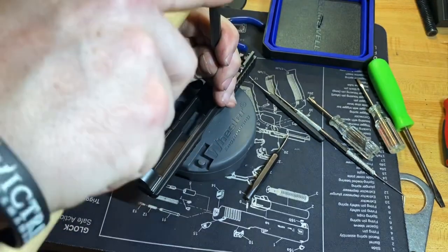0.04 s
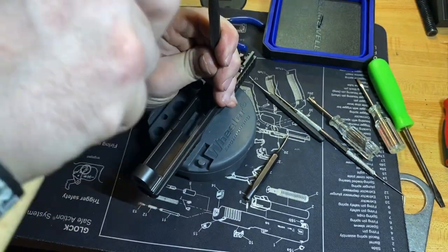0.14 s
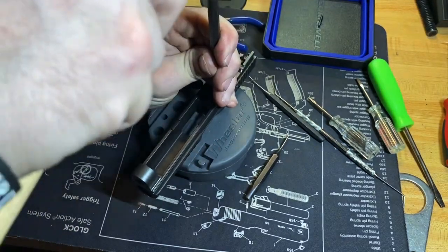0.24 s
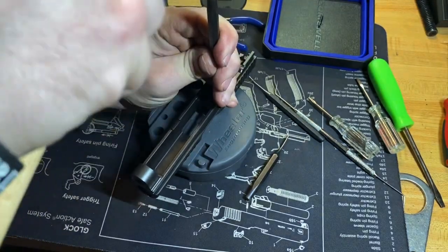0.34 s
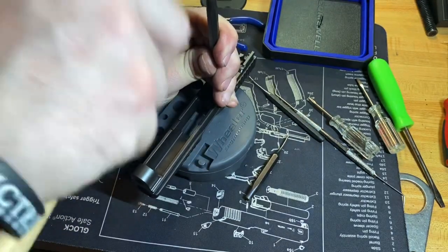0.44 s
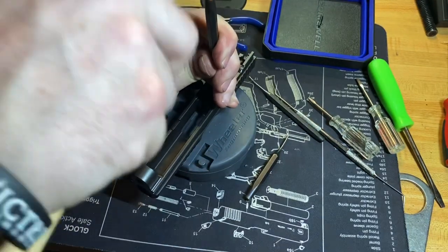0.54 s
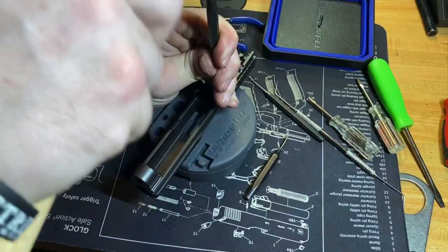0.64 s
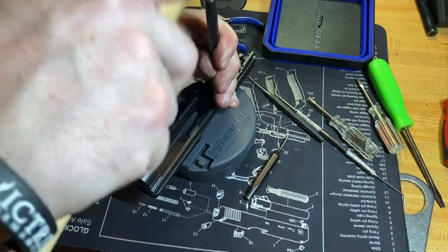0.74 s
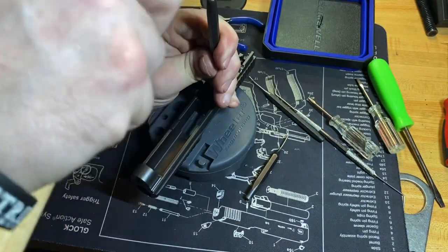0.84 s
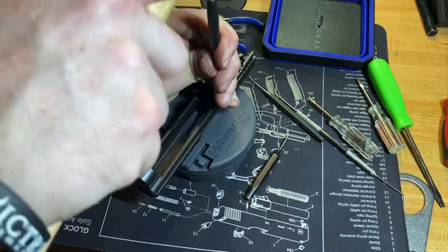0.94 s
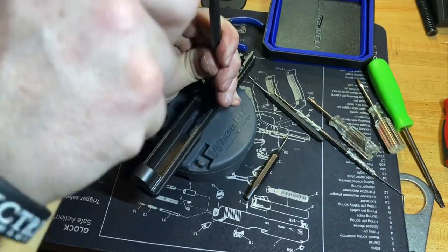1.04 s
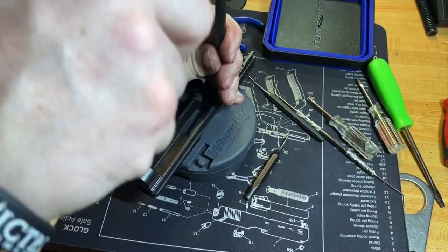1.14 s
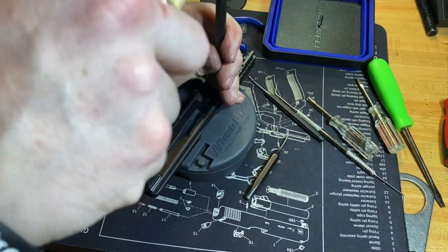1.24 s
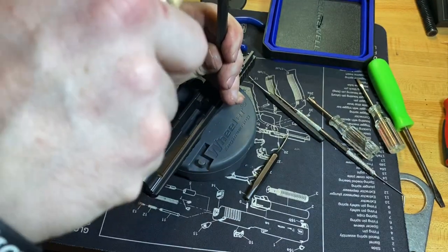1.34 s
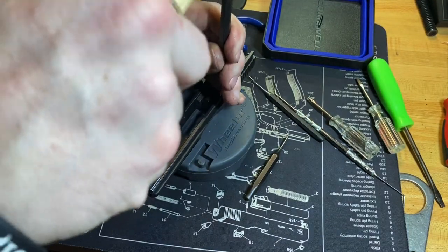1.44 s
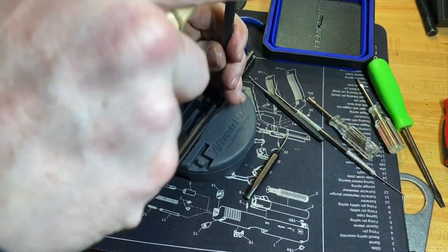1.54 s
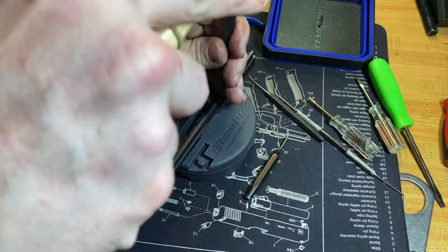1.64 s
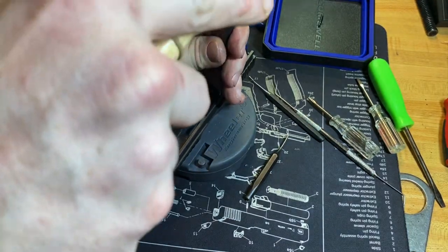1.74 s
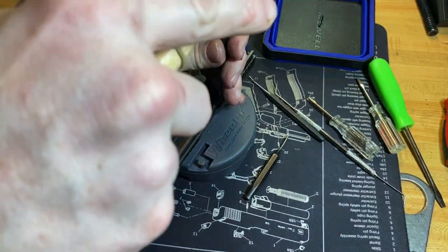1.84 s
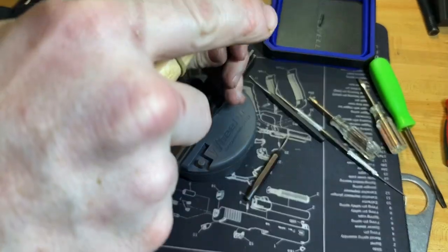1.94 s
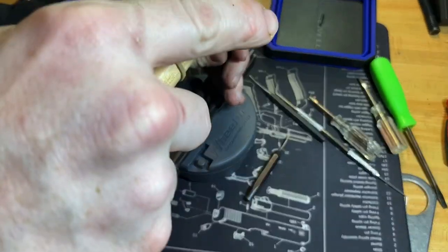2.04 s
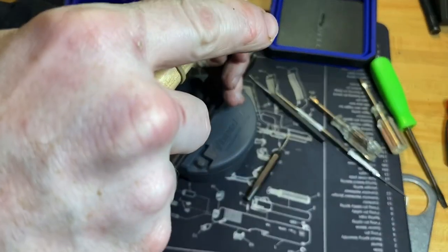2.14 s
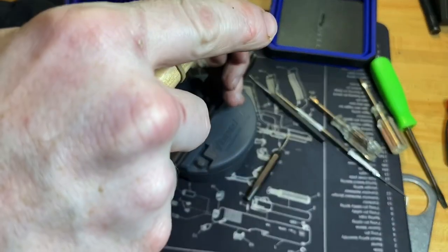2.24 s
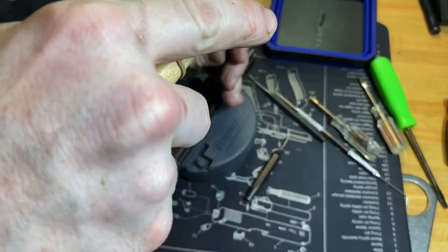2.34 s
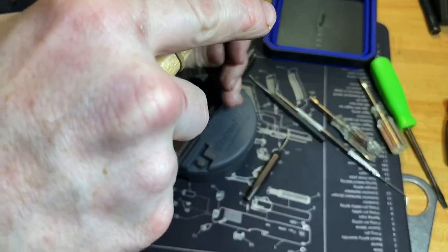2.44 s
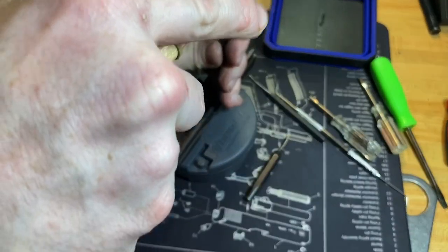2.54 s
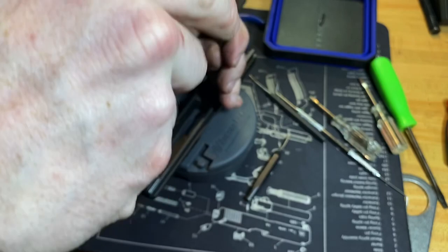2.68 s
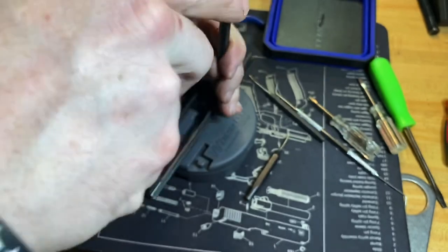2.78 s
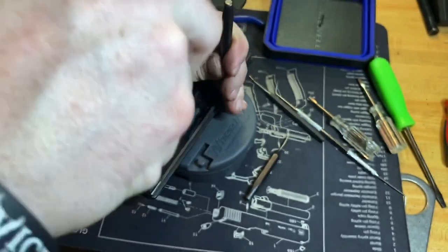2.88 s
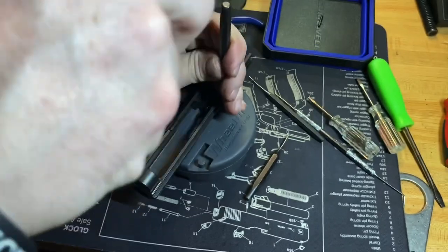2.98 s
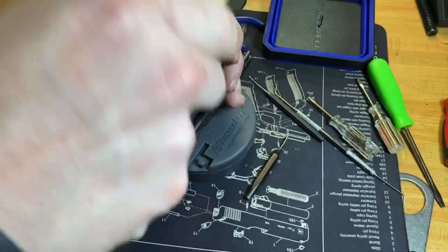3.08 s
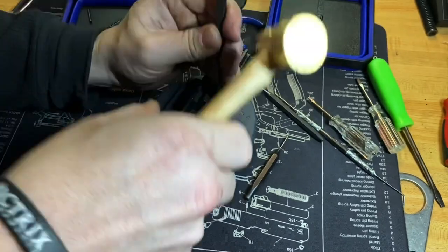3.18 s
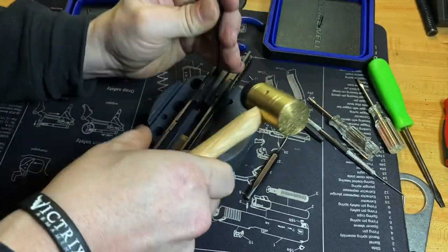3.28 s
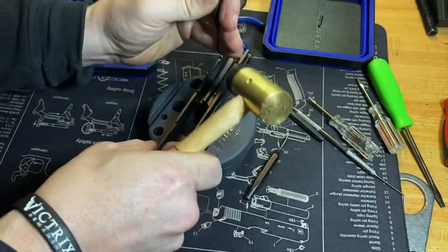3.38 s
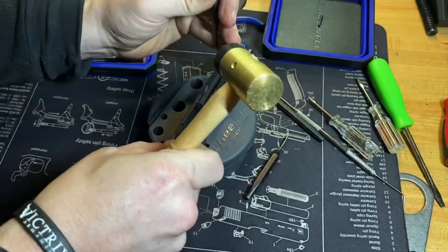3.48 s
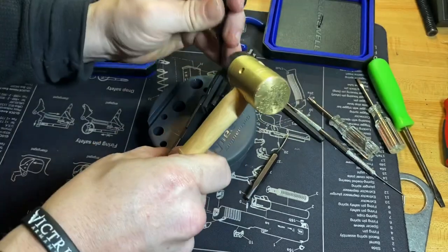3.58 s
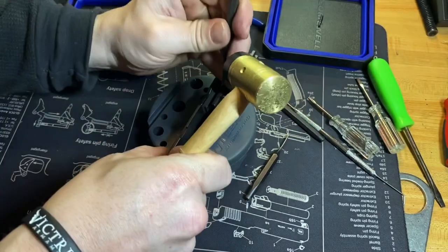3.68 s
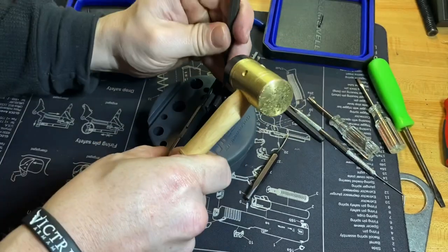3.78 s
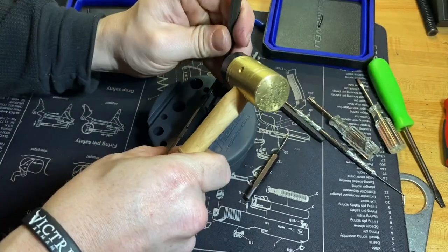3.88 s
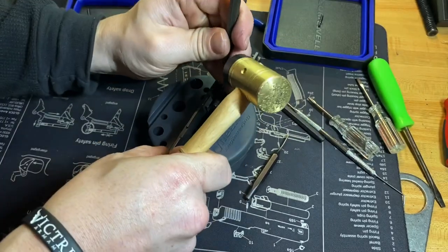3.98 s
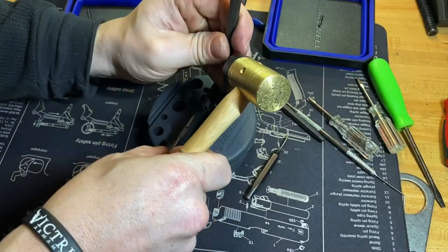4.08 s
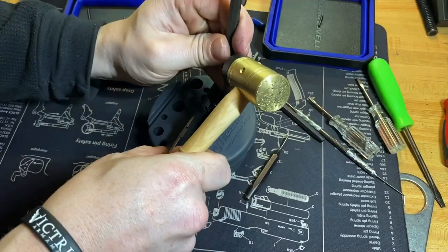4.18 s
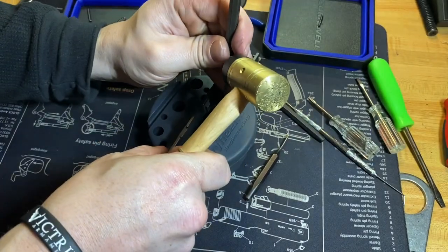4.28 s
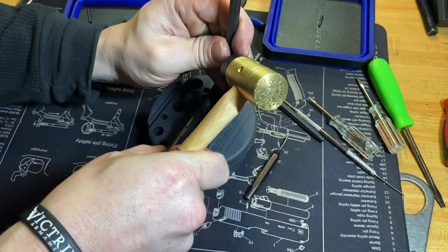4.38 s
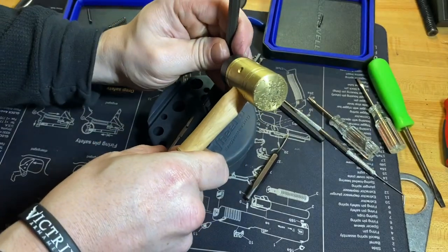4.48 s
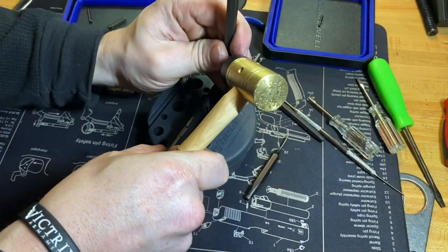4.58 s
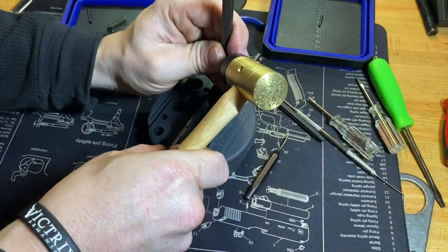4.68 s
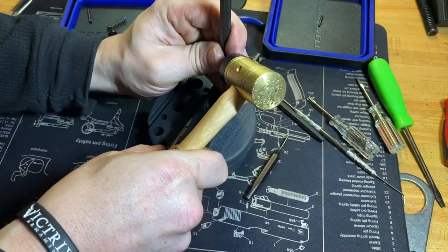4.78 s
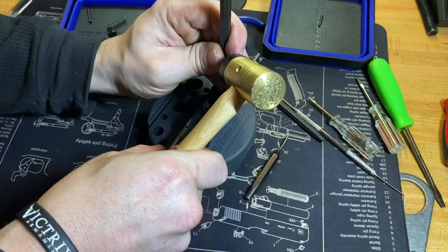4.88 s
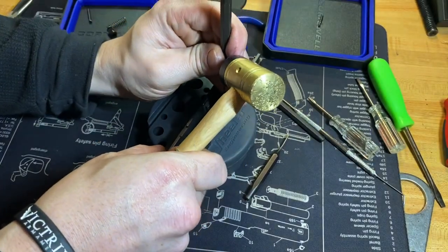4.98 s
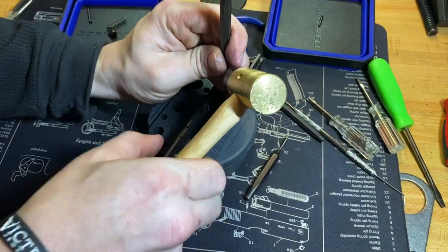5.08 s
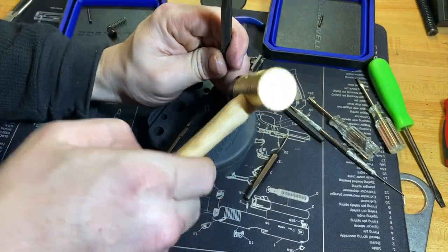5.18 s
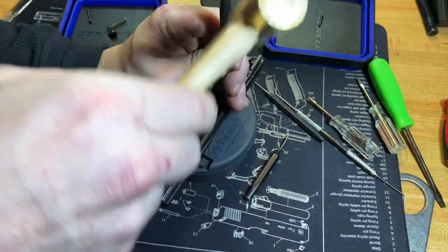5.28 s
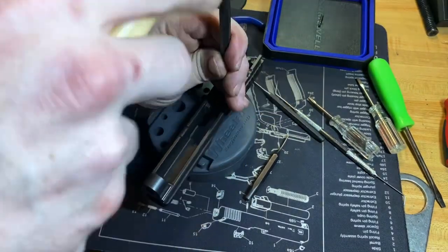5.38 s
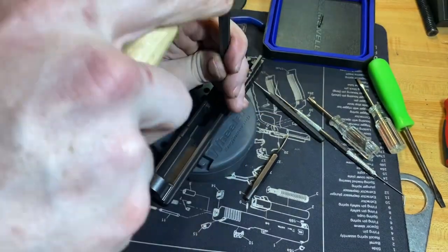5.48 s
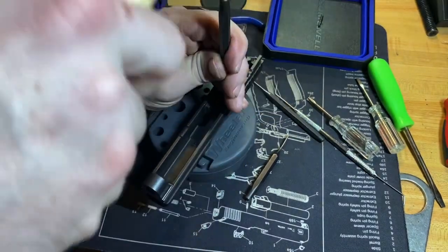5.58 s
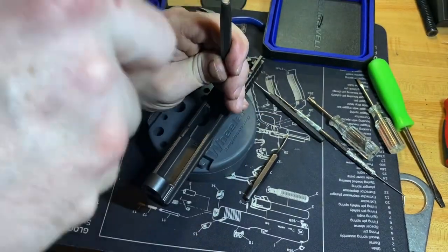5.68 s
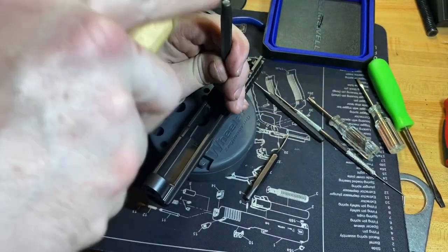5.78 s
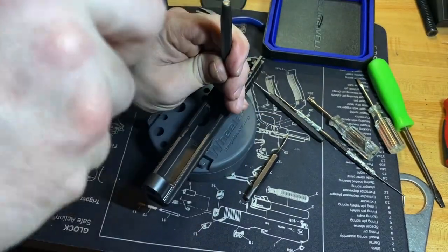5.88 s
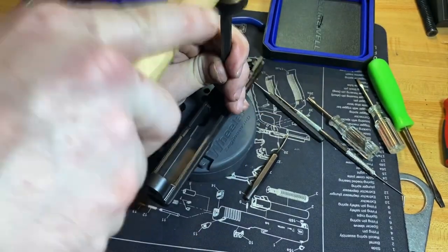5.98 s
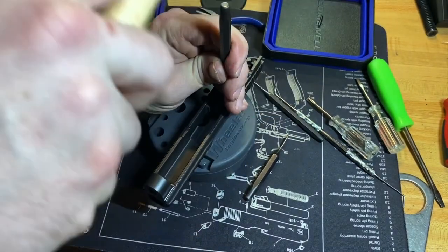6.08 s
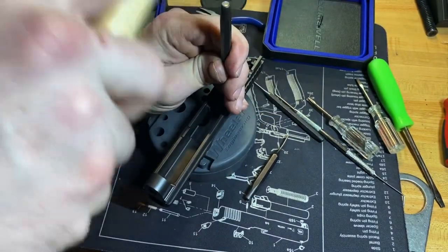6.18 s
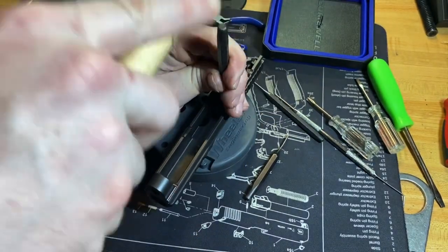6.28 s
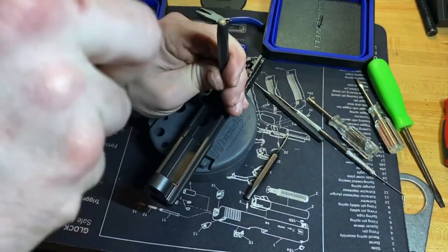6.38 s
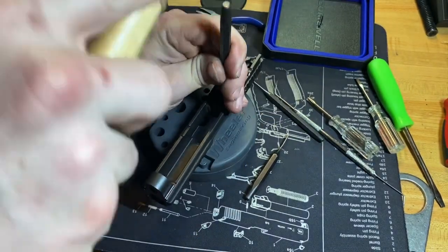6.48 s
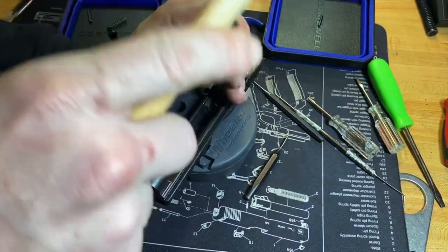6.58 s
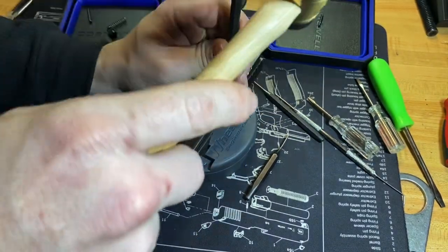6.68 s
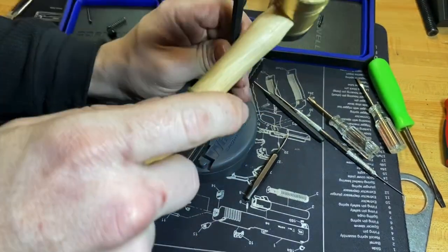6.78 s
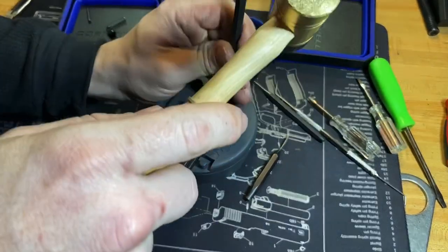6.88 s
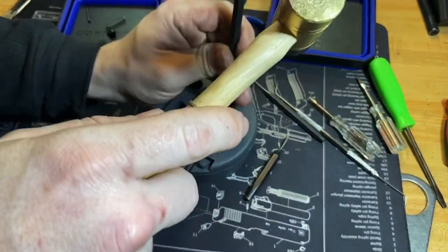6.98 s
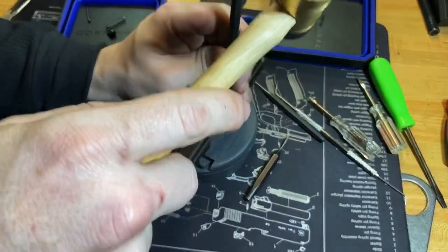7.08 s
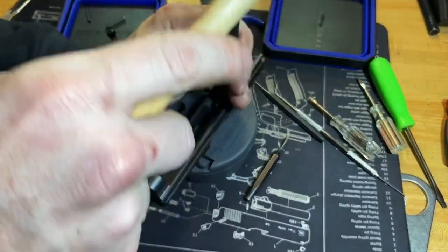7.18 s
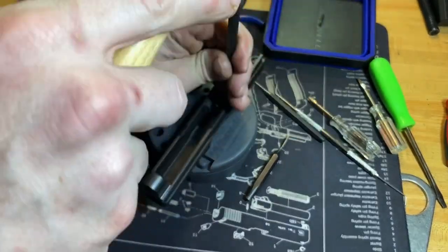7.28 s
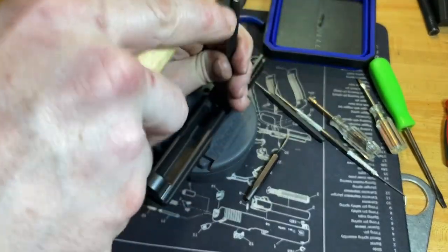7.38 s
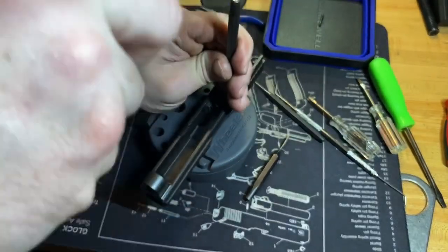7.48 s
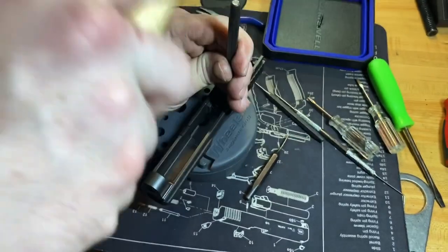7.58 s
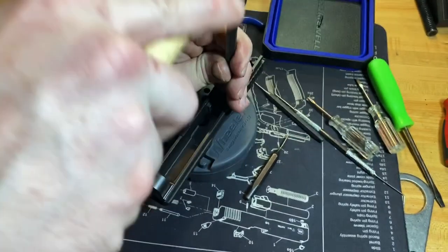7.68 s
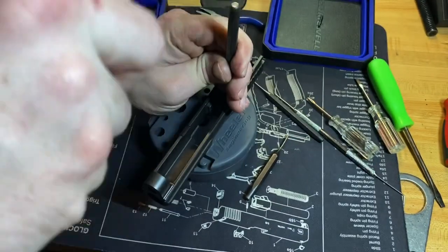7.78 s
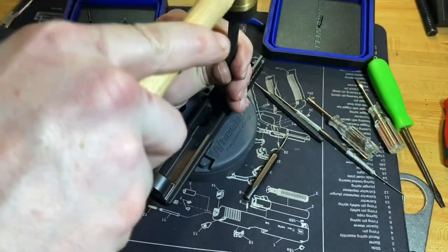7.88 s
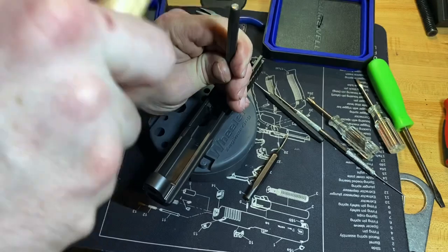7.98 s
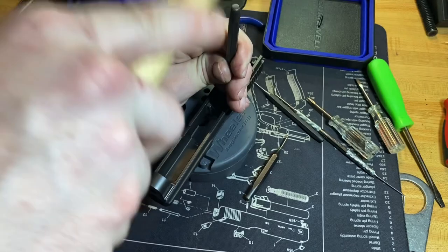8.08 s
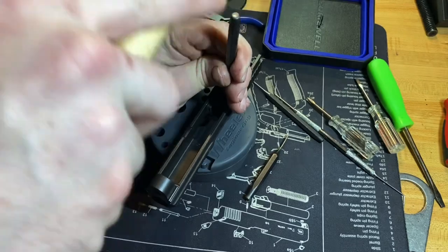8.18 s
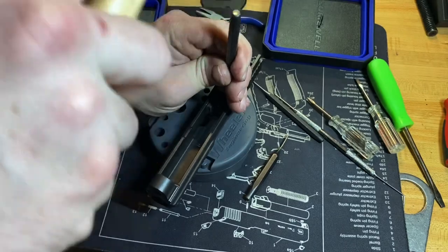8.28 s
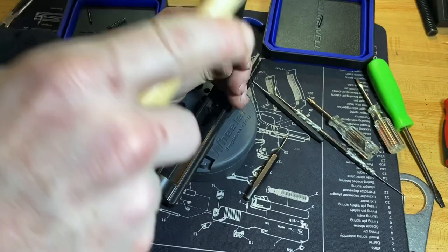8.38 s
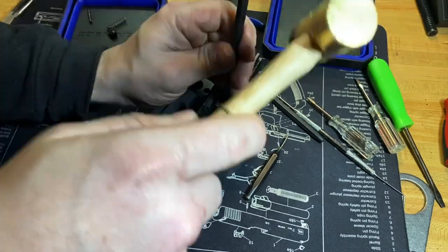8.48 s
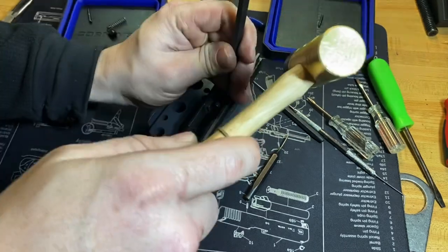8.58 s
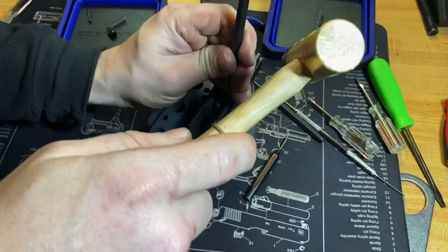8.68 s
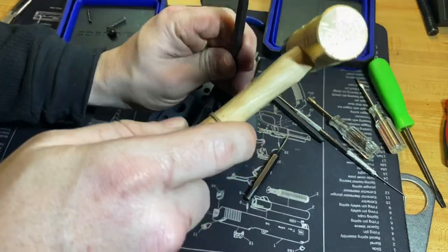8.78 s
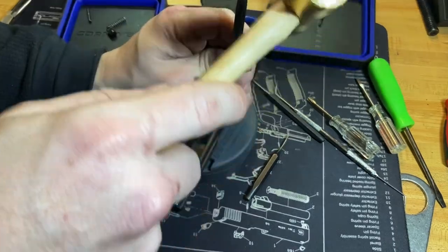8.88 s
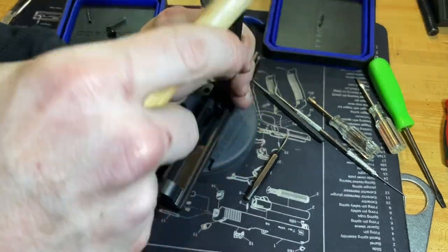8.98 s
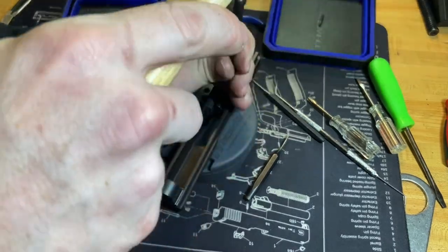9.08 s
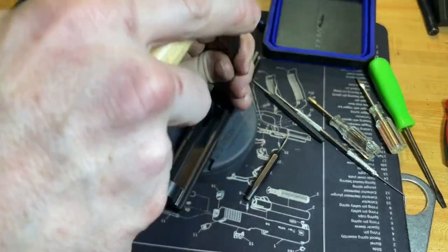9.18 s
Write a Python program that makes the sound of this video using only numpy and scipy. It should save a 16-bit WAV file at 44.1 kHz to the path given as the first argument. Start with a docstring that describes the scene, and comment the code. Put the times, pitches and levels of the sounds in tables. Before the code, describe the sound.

Sharp, dry metal-on-metal blows, each with a bright high ping and a short low thud of the bench. Three at the start, then mostly quiet handling: slight clinks, a tiny steel squeak, hand rustle and a woody knock. Later a pair of strong blows and a final run of three. Miked very close in a small room with short reflections and faint low hum.

```python
"""A small brass hammer taps a hand-held steel punch on a workbench, close to a two-port microphone.
Each blow layers a noise crack, decaying sine modes of the punch (a beating pair near 5.2 kHz) and a
late-swelling thud of low bench modes; some blows are only light touches.
Noise-burst tool ticks, harmonic squeaks, a handle knock and a hiss of hand rustle fill the pauses.
A small room answers the crack and the handling with noise tails, over a low hum of shaped noise."""
import sys
import numpy as np
from scipy import signal
from scipy.fft import rfft, irfft
from scipy.io import wavfile

SR = 44100
rng = np.random.default_rng(int(sys.argv[2]) if len(sys.argv) > 2 else 0)


def transcribe(signal):
    """Save signal, clipped to [-1, 1], as a 16-bit WAV file at the path in sys.argv[1]."""
    frames = np.atleast_2d(signal).T
    limited = np.clip(frames, -1, 1)
    pcm = np.round(limited * 32767).astype(np.int16)
    wavfile.write(sys.argv[1], SR, pcm)


N = 407484


def undb(db):
    """Amplitude factor of a level in dB."""
    return 10 ** (np.asarray(db) / 20)


def unit(x):
    """Scales each row to rms 1."""
    return x / np.sqrt(np.mean(x ** 2, axis=-1, keepdims=True))


def curve(table, hz):
    """Level in dB from breakpoints, straight on a log frequency axis."""
    points = np.array(table)
    return np.interp(np.log(hz + 1), np.log(points[:, 0]), points[:, 1])


def noise(size, gain):
    """Noise of rms 1 coloured by gain(hz); size = (rows, samples)."""
    hz = np.fft.rfftfreq(size[1], 1 / SR)
    return unit(irfft(rfft(rng.standard_normal(size)) * gain(hz), size[1]))


def fade(t, t60):
    """Exponential decay that falls 60 dB in t60 seconds."""
    return np.exp(-np.log(1000) * t / t60)


def add(out, start_s, x):
    """Mixes x into out from start_s on."""
    i = int(start_s * SR)
    out[:, i:i + x.shape[1]] += x[:, :N - i]


def waver(t, db, rate_hz):
    """A slowly wandering gain for each port, db being its rms swing."""
    return undb(db * noise((2, len(t)), lambda f: 1 / (1 + (f / rate_hz) ** 2)))


PORT_LAG = 4  # samples by which the right port hears the shared part later


def ports(pair, alike):
    """Left and right from two noises that share a part; the right port hears it later."""
    left, own = pair
    right = alike * np.roll(left, PORT_LAG) + np.sqrt(1 - alike ** 2) * own
    return np.array([left, right])


def ring(t, hz, db, t60, right_db, lag):
    """One mode; side-on radiation of a bending rod reaches the right port out of step, at its own level."""
    cycles = hz * t - np.array([[0], [lag]])
    return undb([[db], [db + right_db]]) * fade(t, t60) * np.sin(2 * np.pi * cycles)


# colour of the room noise: pitch_hz, relative_density_db (per Hz)
HUM_COLOUR = [(15, -62.5), (25, -32), (42, -9.5), (65, 3.5), (92, -5), (208, -15.5), (296, -12), (389, -24),
              (634, -22), (831, -25.5), (927, -22.5), (1150, -28.5), (4480, -42.5), (5570, -50),
              (16500, -70.5)]
# stereo spread of the hum, side channel against mid: pitch_hz, side_over_mid_db
HUM_SPREAD = [(60, -17.5), (200, -13.5), (400, -0.5), (800, 1.5), (2400, -3), (6000, -1)]
HUM_DB = -54.5  # rms of the mid channel


def hum():
    """Steady room noise, alike at both ports only in the bass."""
    mid, side = rfft(rng.standard_normal((2, N)))
    hz = np.fft.rfftfreq(N, 1 / SR)
    side = side * undb(curve(HUM_SPREAD, hz))
    mid, side = irfft(undb(curve(HUM_COLOUR, hz)) * np.array([mid, side]), N)
    return undb(HUM_DB) * np.array([mid + side, mid - side]) / np.std(mid)


# reverb bands of the room: centre_hz, relative_level_db, t60_s
ROOM_BANDS = [(463, -31.5, 0.24), (1070, -27.5, 0.17), (2340, -32, 0.16), (5030, -37.5, 0.16),
              (8700, -40, 0.18), (13500, -38.5, 0.095)]


def room(x):
    """A small furnished room: a noise tail per band, its own at each port."""
    t = np.arange(SR // 2) / SR
    tail = 0
    for centre_hz, db, t60 in ROOM_BANDS:
        band = noise((2, len(t)), lambda hz: np.exp(-(np.log((hz + 1) / centre_hz) / .55) ** 2))
        tail = tail + undb(db) * np.sqrt(centre_hz / SR) * band * fade(t, t60)
    tail = tail * (1 - np.exp(-(t / 0.0042) ** 2))  # first echoes need a few ms
    send = x[:1] + .5 * x[1:]
    return signal.fftconvolve(send, tail, axes=1)[:, :N]


# strokes of skin, sleeve and sliding steel: start_s, hold_s, level_db
RUSTLE_STROKES = [(2.682, 0.038, -78), (2.779, .01, -57.5), (3.15, 0.057, -79), (3.34, .05, -83),
                  (5.09, 0.093, -81.5), (5.294, 0.12, -77), (5.452, 0.065, -84.5)]
RUSTLE_RISE_S, RUSTLE_FALL_S = .0015, 0.012  # time constants


def rustle():
    """Bright soft hiss while the hands move; each stroke swells, holds and fades."""
    t = np.arange(N) / SR
    gain = 0
    for start_s, hold_s, db in RUSTLE_STROKES:
        before = np.maximum(start_s - t, 0) / RUSTLE_RISE_S
        after = np.maximum(t - start_s - hold_s, 0) / RUSTLE_FALL_S
        gain = gain + undb(db) * np.exp(-(before + after))
    return gain * noise((2, N), lambda hz: hz / (1 + (hz / 9000) ** 3))


# short noise bursts: ticks and knocks of tools and fingers, and at 2.795 s and 2.837 s two further bands of the
# glancing blow at 2.79 s: start_s, level_db, centre_hz, width_hz, t60_s
NOISE_TICKS = [(2.726, -46, 6500, 16000, 0.018), (2.795, -35.5, 870, 298.6, 0.035),
               (2.837, -44.5, 2000, 300, 0.039), (3.297, -59.5, 1484, 1770, 0.053),
               (3.33, -53, 1100, 1200, 0.024), (5.5, -68.5, 14500, 4250, .02),
               (5.741, -33, 6200, 11900, 0.0049), (6.579, -62, 8880, 8050, 0.023),
               (8.648, -74, 8470, 2930, 0.028), (8.75, -66.5, 5240, 202, .08),
               (8.992, -61, 3960, 6940, 0.054)]


def ticks():
    """Short noise bursts, each a resonant hump around one centre."""
    out, t = np.zeros((2, N)), np.arange(SR // 8) / SR
    attack = 1 - np.exp(-t / 0.00029)
    for start_s, db, centre_hz, width_hz, t60 in NOISE_TICKS:
        pair = noise((2, len(t)), lambda hz: 1 / (1 + (2 * (hz - centre_hz) / width_hz) ** 2))
        add(out, start_s, undb(db) * ports(pair, 0.7) * fade(t, t60) * attack)
    return out


# brief squeaks of steel on steel: peak_s, pitch_hz, half_length_s, level_db of harmonics 1-5
STEEL_SQUEAKS = [(1.419, 2240, 0.016, -62, -73, -77, -80, -75),
                 (2.356, 2890, 0.013, -69, -74, -72, -67.5, -73),
                 (2.787, 2930, .007, -42.5, -44, -51.5, -45.5, -51.5)]


def squeaks():
    """Steel rubbing on steel: short swells of harmonics, roughened by noise below 500 Hz."""
    out, t = np.zeros((2, N)), np.arange(N) / SR
    for peak_s, hz, half_length_s, *harmonics_db in STEEL_SQUEAKS:
        rough = 1 + .9 * noise((1, N), lambda f: f < 500)
        swell = rough * np.exp(-((t - peak_s) / half_length_s) ** 2 * 2)
        for k, db in enumerate(harmonics_db, 1):
            out += swell * undb(db) * np.sin(2 * np.pi * k * hz * t)
    return out


# modes of the wooden handle: pitch_hz, level_db, t60_s
HANDLE_MODES = [(575, -25.5, 0.013), (1170, -39.5, 0.025), (1790, -38, 0.015), (2000, -45, 0.032)]
KNOCK_S = 3.5027  # the handle touches down


def handle_knock():
    """The handle touches down: short modes, the lower ones slower to speak."""
    out, t = np.zeros((2, N)), np.arange(SR // 8) / SR
    for hz, db, t60 in HANDLE_MODES:
        add(out, KNOCK_S, ring(t, hz, db, t60, 0, 0) * (1 - np.exp(-t * hz / 1.13)))
    return out


# bench top modes: pitch_hz, level_db (against the thud), t60_s
BENCH_MODES = [(56, -21, .4), (89.4, -8.5, .12), (116, -2.5, 0.13), (142.5, -5, .2), (180, -26, 0.13),
               (212, -14.5, 0.16), (249, -22, 0.29), (279, -25, 0.24), (367, -27.5, 0.25)]
BENCH_DELAY_S, BENCH_RISE_S = 0.0021, 0.0012


def bench(t):
    """Thud of a unit blow: neighbouring modes start in opposite senses, so it swells late."""
    t = np.maximum(t - BENCH_DELAY_S, 0)
    thud, sense = 0, 1
    for hz, db, t60 in BENCH_MODES:
        thud = thud + sense * undb(db) * fade(t, t60) * np.sin(2 * np.pi * hz * t)
        sense = -sense
    return thud * (1 - np.exp(-t / BENCH_RISE_S)) * undb([[.4], [-.4]])  # nearly alike at both ports


def burst(t, table, db, t60, alike):
    """A fast-dying noise confined to the span of its spectrum."""
    low_hz, high_hz = table[0][0], table[-1][0]

    def colour(hz):
        return undb(curve(table, hz)) / (1 + (low_hz / (hz + 1)) ** 8) / (1 + (hz / high_hz) ** 8)

    return undb(db) * ports(noise((2, len(t)), colour), alike) * fade(t, t60)


# colours of crack, treble and body of the impact: pitch_hz, relative_density_db (per Hz)
CRACK_COLOUR = [(1400, -8), (2200, -9.5), (3000, -6), (4500, -7), (7000, -9.5)]
TREBLE_COLOUR = [(7000, -3), (9000, -3), (12000, -7.5), (13800, -5), (15500, -3)]
BODY_COLOUR = [(250, 3.5), (400, 5.5), (800, 0.5), (1200, 1.5), (1500, -9.5)]
# fainter modes of the part and its block: pitch_hz, over_crack_db, t60_s, right_port_db, right_lag_cycles
FAINT_MODES = [(1200, -22.5, 0.03, 0, .1), (2060, -21.5, 0.025, -4, 0.12), (2270, -22.5, 0.025, -4, 0.22),
               (3038, -13.5, 0.04, -1, 0.12), (4820, -9.5, 0.035, -5.5, 0.74)]
CRACK_T60_S, TREBLE_T60_S, BODY_T60_S = 0.026, 0.026, 0.033
BODY_DB = -10.5  # over the mean of crack and thud


def crack(t, crack_db, treble_db, thud_db):
    """Impact noise in three bands, plus faint modes that differ a little from blow to blow."""
    body_db = (crack_db + thud_db) / 2 + BODY_DB
    out = undb([[2.5], [-3.5]]) * burst(t, CRACK_COLOUR, crack_db, CRACK_T60_S, 0.77)
    out = out + burst(t, BODY_COLOUR, body_db, BODY_T60_S, .9)
    out = out + burst(t, TREBLE_COLOUR, treble_db, TREBLE_T60_S, 0.71)
    for hz, db, *rest in FAINT_MODES:
        detune, scatter = rng.standard_normal(2)
        out = out + ring(t, hz * (1 + 0.0084 * detune), crack_db + db + 3 * scatter, *rest)
    return out * (1 - np.exp(-t / .0005))


# crowded high modes of the tools on the mat, as bands: centre_hz, half_width_hz, over_treble_db, t60_s
SHIMMER_BANDS = [(7400, 700, -24.5, .15), (9926, 800, -25.5, 0.16), (12200, 800, -25.5, 0.17),
                 (15400, 500, -24.5, .13)]


def shimmer(t, treble_db):
    """Treble noise bands that outlast the crack."""
    out = 0
    for hz, width, db, t60 in SHIMMER_BANDS:
        band = noise((2, len(t)), lambda f: np.exp(-((f - hz) / width) ** 2))
        out = out + undb(treble_db + db) * fade(t, t60) * band
    return out * (1 - np.exp(-t / 0.00067))


def linger(t, hz, db, t60):
    """A mode heard back from the walls: the same pitch, wavering differently at each port."""
    tone = np.sin(2 * np.pi * (hz * t + rng.random((2, 1))))
    return undb(db) * waver(t, 5, 30) * tone * fade(t, t60) * (1 - np.exp(-t / .004))


# punch modes 1-7 in the grip, and the ring lingering in the room:
# t60_s, right_port_db, right_lag_cycles, linger_over_mode_db, linger_t60_s
PUNCH_MODES = [(.03, -1.5, 0.17, -23.5, .08), (0.14, -7.5, .48, -16, 0.27), (0.17, -10, 0.57, -19.5, 0.21),
               (0.18, -12.5, 0.53, -20.5, 0.32), (0.06, 10.5, .8, -16, 0.13), (0.07, -3, 0.94, -18, .09),
               (0.11, 0.5, 0.58, -19, 0.099)]
# starting sense of modes 1-7; twins 3 and 4 start opposed, so their beat swells before it first dips: sign
MODE_SENSE = (1, 1, 1, -1, 1, 1, 1)
GRIP_WAVER_DB = 1.8  # rms


def punch(t, pitches_hz, levels_db):
    """The seven modes of one blow; the fingers on the shank make the decay uneven."""
    out = 0
    for hz, db, sense, mode in zip(pitches_hz, levels_db, MODE_SENSE, PUNCH_MODES):
        t60, right_db, lag, linger_db, linger_t60 = mode
        direct = sense * ring(t, hz, db, t60, right_db, lag) * waver(t, GRIP_WAVER_DB, 45)
        out = out + direct + linger(t, hz, db + linger_db, linger_t60)
    return out


# hammer on punch: start_s, crack_db, treble_over_crack_db, thud_db, low_ring_db (mode 2),
# twin_ring_db (mean of modes 3 and 4), upper_over_lower_twin_db
HAMMER_BLOWS = [(0.016, -15.5, -13, -20, -26.5, -16, -6.5), (0.4796, -14, -13.5, -15.5, -19, -18, 9),
                (0.7057, -16, -10.5, -18, -22, -16, -3), (1.4596, -39, -7, -54, -40, -37, 12),
                (2.0848, -78, -1, -61, -57, -71.5, -7), (2.7926, -20, -2, -37.5, -32.5, -16.5, 9.5),
                (3.503, -72, -11, -49, -53, -77, -8), (4.5919, -52, -18, -69, -44.5, -57.5, 1),
                (5.992, -13, -9, -14.5, -26, -14.5, 0), (6.2269, -12.5, -11, -13, -21.5, -12.5, 2),
                (7.6242, -12.5, -11, -14, -22, -14, 0), (7.8643, -11.5, -11.5, -13, -13.5, -13.5, 3.5),
                (8.105, -12, -9, -13, -21.5, -17, 2.5)]
# lower twin (mode 3) of each blow: pitch_hz
LOWER_TWIN_HZ = (5192, 5187, 5185, 5153, 5151, 5172, 5140, 5150, 5177, 5147, 5182, 5171, 5150)
# modes 2-4, shifting together with the grip: multiple of the lower twin's pitch
BENDING_RATIOS = (.7465, 1, 1.0251)
# modes 5-7: pitch_hz
UPPER_MODES_HZ = (7890, 10360, 12120)
# modes 5-7, depending on where the blow lands: over_treble_db, before scatter
UPPER_MODES_DB = (-13, -24, -19.5)
UPPER_SCATTER_DB = 3.5
LOWEST_HZ = 2750  # mode 1
LOWEST_DB, LOWEST_SLOPE = -34, 0.27  # grows only 0.27 dB per dB of crack, so light touches favour it


def hammer():
    """Each blow drives the crack in the air, the ring of the steel and the thud through the bench."""
    air, steel, wood = np.zeros((3, 2, N))
    t = np.arange(SR // 2) / SR
    thud = bench(t)
    for blow, twin_hz in zip(HAMMER_BLOWS, LOWER_TWIN_HZ):
        start_s, crack_db, bright_db, thud_db, low_db, twin_db, tilt_db = blow
        treble_db = crack_db + bright_db
        scatter_db = UPPER_SCATTER_DB * rng.standard_normal(len(UPPER_MODES_DB))
        upper_db = treble_db + np.array(UPPER_MODES_DB) + scatter_db
        lowest_db = LOWEST_DB + LOWEST_SLOPE * crack_db
        levels_db = (lowest_db, low_db, twin_db - tilt_db / 2, twin_db + tilt_db / 2, *upper_db)
        pitches_hz = (LOWEST_HZ, *(twin_hz * np.array(BENDING_RATIOS)), *UPPER_MODES_HZ)
        struck = punch(t, pitches_hz, levels_db) * (1 - np.exp(-t / 0.00014))
        add(air, start_s, crack(t, crack_db, treble_db, thud_db))
        add(steel, start_s, struck + shimmer(t, treble_db))
        add(wood, start_s, undb(thud_db) * thud)
    return air, steel, wood


def scene():
    """Mixes all layers; only crack, ticks, squeaks and knock feed the room tail."""
    air, steel, wood = hammer()
    air = air + ticks() + squeaks() + handle_knock()
    return air + room(air) + steel + wood + rustle() + hum()


# treble dips of the microphone housing: centre_hz, width_hz, gain_db
HOUSING_DIPS = [(8500, 620, -9), (14000, 540, -14)]
CLIP = 0.73  # full-scale ceiling toward which peaks are rounded
TOP_HZ = 16700  # edge of the steep treble cut


def record(dry):
    """The microphone housing has two treble dips; the recorder rounds peaks and cuts the top steeply."""
    for hz, width, db in HOUSING_DIPS:
        b, a = signal.iirpeak(hz, hz / width, fs=SR)
        dry = dry - (1 - undb(db)) * signal.lfilter(b, a, dry)
    rounded = CLIP * np.tanh(dry / CLIP)
    top_cut = signal.ellip(10, .2, 80, TOP_HZ, fs=SR, output="sos")
    return signal.sosfilt(top_cut, rounded)


dry = scene()
out = record(dry)
transcribe(out)
```